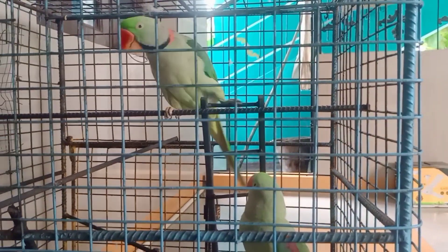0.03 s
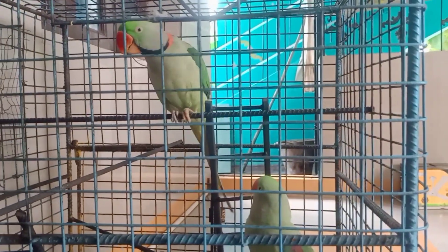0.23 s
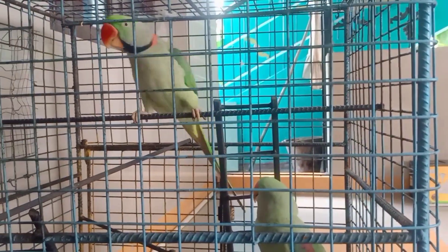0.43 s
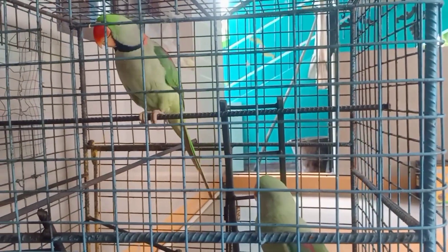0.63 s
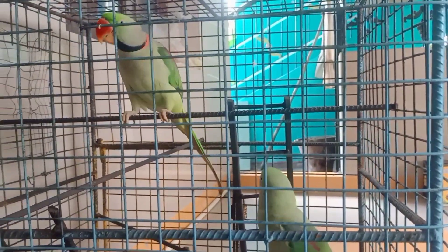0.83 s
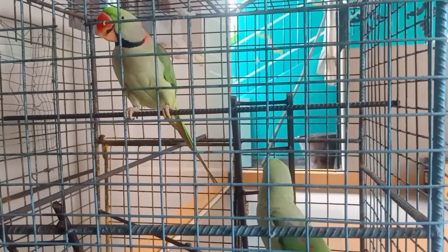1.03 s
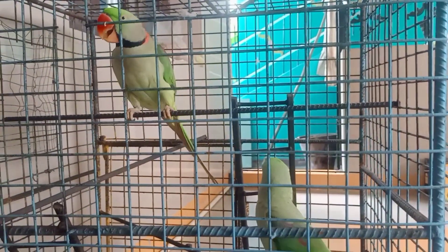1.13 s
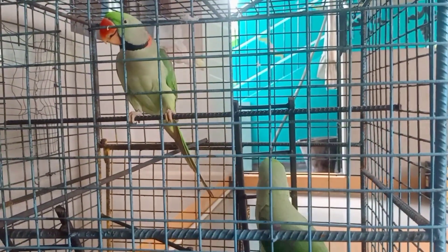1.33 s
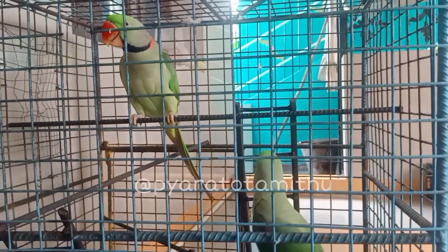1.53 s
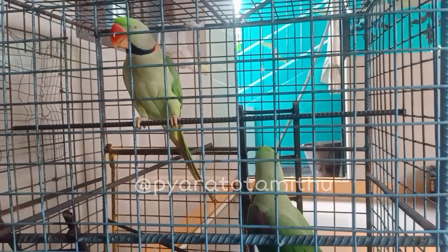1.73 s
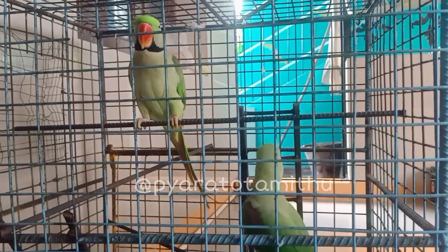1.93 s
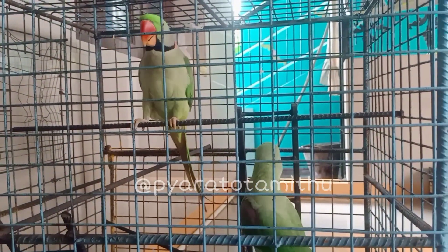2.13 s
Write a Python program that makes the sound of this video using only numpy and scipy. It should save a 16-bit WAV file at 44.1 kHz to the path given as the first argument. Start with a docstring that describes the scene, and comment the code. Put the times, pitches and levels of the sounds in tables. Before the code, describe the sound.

One shrill parakeet squawk cuts through a steady indoor hiss, stepping down in pitch and briefly overloading the microphone. The room echoes for a moment, and the hiss carries on more quietly afterwards.

```python
"""A parakeet calls in a hard-walled room

A caged parakeet gives one loud call: a rasp that sweeps up through its throat resonance, a high
sagging whistle that briefly overloads the left microphone, then a sudden break down to a lower note.
The room rings on behind it, over a hiss of shaped noise, a few dull bumps and two faint tinks.
The recorder's gain control turns down for the call and stays partly down afterwards."""
import sys
import numpy as np
from scipy import signal
from scipy.fft import rfft, irfft, next_fast_len
from scipy.io import wavfile
from scipy.ndimage import uniform_filter1d, minimum_filter1d, map_coordinates

SR = 44100
rng = np.random.default_rng(int(sys.argv[2]) if len(sys.argv) > 2 else 0)


def transcribe(u):
    """Save the signal u as a 16-bit wav file named by the first command-line argument.

    u: samples, shape (n,) or (channels, n), limited to [-1, 1]; the rate is SR.
    q: integer samples, one column per channel.
    """
    v = np.clip(np.atleast_2d(u).T, -1, 1)
    q = np.round(v * 32767).astype(np.int16)
    wavfile.write(sys.argv[1], SR, q)


N = 96887

# The tone of the hiss. Each row: frequency in Hz, relative level in dB.
HISS_TONE = [(15, -50), (25, -38), (59, -13.5), (125, -10), (196, -18.5), (250, -9.5), (450, -3),
             (543, 1.5), (749, -6), (1030, -3.5), (1540, -7.5), (2370, -9), (3930, -20), (4500, -25),
             (6900, -35.5), (9520, -64), (15000, -92)]
# How alike the hiss is on both sides. Each row: frequency in Hz, likeness (1 is identical).
HISS_LIKENESS = [(60, 0.96), (290, 1), (640, 0.067), (1410, 0.27), (3100, 0.14), (6800, 0.082)]
# Which way the hiss leans. Each row: frequency in Hz, left minus right in dB.
HISS_LEAN = [(100, 0), (400, -1.5), (1300, -5), (2400, -0.5), (4400, 2.5), (8000, 14)]
# Swells in the hollow low middle of the hiss. Each row: time in seconds, boost in dB.
BODY_SWELLS = [(0, -7), (.1, -4), (.3, 1.5), (.39, -4.5), (.54, -1.5), (.72, -4), (.78, 0), (.98, -2.5),
               (1.08, 0), (1.22, 0.5), (1.4, -4), (1.85, -9), (2.1, -13.5)]
# Swells in the treble of the hiss. Each row: time in seconds, boost in dB.
TREBLE_SWELLS = [(0, -1), (.26, 0.5), (.38, -2), (.48, -5.5), (.66, -6.5), (.78, -2), (1.2, 0), (2.1, -2)]
# Dull bumps. Each row: middle in seconds, half length in seconds, level in dB, pitch in Hz.
LOW_BUMPS = [(0.197, 0.037, -50, 130), (.63, 0.048, -47, 114), (1.048, 0.12, -60, 66),
             (1.146, 0.0056, -41, 126), (1.398, 0.017, -19.5, 90)]
# How long the room rings. Each row: frequency in Hz, seconds to fade by 60 dB.
ROOM_RING = [(500, 0.15), (2300, 0.48), (2900, 0.48), (4500, 0.45), (8000, 0.41), (14000, 0.33)]
# Faint tinks. Each row: start in seconds, level in dB.
WIRE_TINKS = [(.345, -50), (.364, -51)]
# How the bird's throat shapes sound. Each row: frequency in Hz, relative level in dB.
THROAT_TONE = [(300, -68.5), (450, -26.5), (680, -10), (1000, -10.5), (1700, -19), (2400, 3.5),
               (3150, -5.5), (3720, -4.5), (5100, -16.5), (7000, -24), (9800, -53.5), (15000, -46)]
# The opening rasp. Each row: time in seconds, pitch in Hz, level in dB.
RASP_SWEEP = [(1.275, 590, -13), (1.281, 700, -4), (1.286, 930, 0), (1.289, 1300, 4.5), (1.292, 1620, 6.5),
              (1.296, 2050, 7), (1.300, 2180, -2), (1.305, 2420, -3)]
# The high whistle; standing waves in the room boost or weaken it at each microphone.
# Each row: time in seconds, pitch in Hz, level in dB, left boost in dB, right boost in dB.
HIGH_NOTE = [(1.305, 3097, 0, -3, 10.5), (1.312, 3082, 6, 2.5, 6.5), (1.325, 3017, 4.5, 9, 2.5),
             (1.341, 3022, 5.5, -12.5, 1.5), (1.353, 3017, 5.5, 1.5, -12.5), (1.375, 2961, 3.5, 4, 4.5),
             (1.381, 2877, 8, 7, 9.5), (1.400, 2824, 8.5, 3, 14.5), (1.411, 2742, 5.5, -2, -23)]
# The lower note after the break, with the same columns.
LOW_NOTE = [(1.409, 2346, 10, -11, -9), (1.417, 2209, 8.5, -1, 2.5), (1.443, 2191, 4, -10, 15.5),
            (1.466, 2196, 5.5, -26, 10), (1.481, 2233, 8, -6.5, 4.5), (1.491, 2273, 3, -4.5, -9)]
# Each note's harmonics. Each entry: starting level in dB at 1, 2, 3.. times the pitch.
HIGH_HARMONICS = [1, -16.5, -37, -47, -44]
LOW_HARMONICS = [-3, -11, -22, -39.5, -51]
# Distortion from the overloaded left microphone. Each row: multiple of the pitch, level in dB.
OVERLOAD_TONES = [(3, -4.5), (4, -31.5), (5, -12.5)]
# The fizz of microphone overload. Each row: frequency in Hz, relative level in dB.
FIZZ_TONE = [(5000, -33.5), (8500, 2.5), (10000, -12), (11300, 0.5), (12500, -12), (14000, -4.5),
             (15500, -14)]
# The right microphone hears the bird duller. Each row: frequency in Hz, gain in dB.
RIGHT_MIC_TONE = [(3000, -0.5), (6500, -7.5), (8500, -23.5), (15000, -21)]

TIME = np.arange(N) / SR  # seconds
JITTER_HZ = 900  # how fast the voice trembles


def amp(db):
    """Turn decibels into a gain."""
    return 10 ** (np.asarray(db) / 20)


def unit(x):
    """Scale a sound to an average (rms) level of 1."""
    return x / np.sqrt(np.mean(x ** 2) + 1e-20)


def along(table, hz):
    """Read between the rows of a frequency table, on a log scale."""
    freqs, values = np.transpose(table)
    return np.interp(np.log(hz + 1), np.log(freqs + 1), values)


def curves(rows):
    """Join the rows of a time table into one curve for each column after the time."""
    times, *columns = np.transpose(rows)
    return [np.interp(TIME, times, column) for column in columns]


def wobble(rate_hz):
    """A smooth curve through rate_hz random values a second."""
    return map_coordinates(rng.standard_normal(N), [TIME * rate_hz])


def filtered(x, response):
    """Scale each frequency of x by response(hz)."""
    size = next_fast_len(N + SR // 2)
    return irfft(rfft(x, size) * response(np.fft.rfftfreq(size, 1 / SR)), size)[..., :N]


def band(centre_hz, octaves):
    """A bell-shaped filter response around one pitch."""
    return lambda hz: np.exp(-.5 * (np.log2((hz + 1) / centre_hz) / octaves) ** 2)


def shaped_noise(tone):
    """Noise with the tone that a table gives."""
    return unit(filtered(rng.standard_normal(N), lambda hz: amp(along(tone, hz))))


def panned(pan_db):
    """Left and right gains of constant total power; positive leans left."""
    gains = amp(np.array([pan_db, -pan_db]) / 2)
    return gains / np.sqrt(np.mean(gains ** 2, axis=0))


def hump(middle_s, half_length_s):
    """A smooth rise and fall around one moment."""
    return np.exp(-((TIME - middle_s) / half_length_s) ** 2)


def gate(rows, edge_s=0.0027):
    """Fade in quickly at the first row's time and out at the last."""
    inside_s = np.minimum(TIME - rows[0][0], rows[-1][0] - TIME)
    return np.sin(np.pi / 2 * np.clip(inside_s / edge_s + .5, 0, 1)) ** 2


def hiss(ring_hz=540.5, ring_width_hz=21, level_db=-33, rise_db_per_s=0.25):
    """A background rush with a hollow resonance, alike on both sides only in the bass."""
    def colour(hz):
        split = np.arccos(np.clip(along(HISS_LIKENESS, hz), -1, 1)) / 2
        ring_db = 5 / (1 + ((hz - ring_hz) / ring_width_hz) ** 2)
        return amp(along(HISS_TONE, hz) + ring_db) * [np.cos(split), np.sin(split)]
    mid, side = filtered(rng.standard_normal((2, N)), colour)  # the shared and the opposite part
    pair = np.array([mid + side, mid - side])
    pair = unit(filtered(pair, lambda hz: panned(along(HISS_LEAN, hz))))
    waver_db = .35 * wobble(rate_hz=6.53)
    return pair * amp(level_db + rise_db_per_s * TIME + waver_db)


def swelling(x, treble_hz=4000):
    """The low middle and the treble of the hiss swell and sink separately."""
    body = filtered(x, band(centre_hz=495, octaves=0.67))
    treble = filtered(x, lambda hz: hz ** 2 / (hz ** 2 + treble_hz ** 2))
    body_gain = amp(curves(BODY_SWELLS)[0])
    treble_gain = amp(curves(TREBLE_SWELLS)[0])
    return x + body * (body_gain - 1) + treble * (treble_gain - 1)


def bumps(width_db=-3):
    """Dull bumps of low noise, the loudest under the peak of the whistle."""
    out = np.zeros((2, N))
    for middle_s, half_length_s, db, pitch_hz in LOW_BUMPS:
        mid, side = unit(filtered(rng.standard_normal((2, N)), band(pitch_hz, octaves=1)))
        side = side * amp(width_db)
        out += np.array([mid + side, mid - side]) * amp(db) * hump(middle_s, half_length_s)
    return out


def room(x, early_s=0.012, early_db=-11, tail_db=-3.5):
    """The echoes of x: near walls answer at once, then a tail rings, longest around the bird's pitch."""
    hz, times, spectrum = signal.stft(rng.standard_normal((2, SR)), SR, nperseg=256)
    fade = amp(-60 * times / along(ROOM_RING, hz)[:, None])
    tail = signal.istft(spectrum * fade, SR, nperseg=256)[1]
    age = np.arange(tail.shape[1]) / SR
    early = rng.standard_normal(tail.shape) * np.exp(-age / early_s)
    echoes = amp(tail_db) * tail / np.linalg.norm(tail[0])
    echoes += amp(early_db) * early / np.linalg.norm(early[0])
    return signal.fftconvolve(x[None], echoes, axes=1)[:, :N]


def tinks(pitch_hz=5000, ring_s=0.063, attack_s=0.0028):
    """Faint high tinks, probably a cage wire touched by a claw."""
    out = np.zeros(N)
    for start_s, db in WIRE_TINKS:
        age = np.maximum(TIME - start_s, 0)
        loudness = amp(db - 60 * age / ring_s) * (1 - np.exp(-age / attack_s))
        out += loudness * np.sin(2 * np.pi * pitch_hz * age)
    return out + room(out)


def overload_fizz(level_db=-34):
    """Thin treble fizz of distortion at the call's loudest moment."""
    return shaped_noise(FIZZ_TONE) * amp(level_db) * hump(middle_s=1.398, half_length_s=0.041)


def mic_overload(phase, roughness=.09):
    """Brief harsh distortion as the whistle's peak overloads the left microphone."""
    rough_phase = phase + roughness * wobble(JITTER_HZ)
    distortion = sum(amp(db) * np.sin(round(k) * rough_phase) for k, db in OVERLOAD_TONES)
    return distortion * hump(middle_s=1.393, half_length_s=0.011)


def voice_phase(pitch_hz, jitter):
    """The running angle of a vibration whose pitch trembles by the fraction jitter."""
    return 2 * np.pi * np.cumsum(pitch_hz * (1 + jitter * wobble(JITTER_HZ))) / SR


def rasp(base_tone_db=-15, air_db=-8):
    """An unsteady buzz sweeps up through the throat resonance, with a puff of air in each cycle."""
    pitch_hz, level_db = curves(RASP_SWEEP)
    phase = voice_phase(pitch_hz, jitter=.008)
    multiples = np.arange(1, 9)[:, None]
    weights = amp(along(THROAT_TONE, multiples * pitch_hz))
    buzz = (weights * np.sin(multiples * phase)).sum(0) / np.sqrt((weights ** 2).sum(0) / 2)
    buzz += amp(base_tone_db) * np.sqrt(2) * np.sin(phase)
    puffs = amp(air_db) * shaped_noise(THROAT_TONE) * (1 + .5 * np.cos(phase))
    return gate(RASP_SWEEP) * amp(level_db) * (buzz + puffs)


def whistle(rows, harmonics_db, mellow_db_per_s, jitter, air_db, air_fade_db_per_s=183.5):
    """A note grows purer as overtones and rushing air fade; gives sound, microphone gains and phase."""
    pitch_hz, level_db, left_db, right_db = curves(rows)
    age = np.clip(TIME - rows[0][0], 0, rows[-1][0] - rows[0][0])
    phase = voice_phase(pitch_hz, jitter)
    base, *overtones = [np.sqrt(2) * amp(db) * np.sin(k * phase) for k, db in enumerate(harmonics_db, 1)]
    tone = base + amp(-mellow_db_per_s * age) * sum(overtones)
    air = amp(air_db - air_fade_db_per_s * age) * shaped_noise(THROAT_TONE)
    return gate(rows) * amp(level_db) * (tone + air), amp([left_db, right_db]), phase


def parakeet(low_cut_hz=530):
    """Rasp, high whistle and low note, with room echoes and microphone overload at the peak."""
    opening, fizz = rasp(), overload_fizz()
    high, high_gains, high_phase = whistle(
        HIGH_NOTE, HIGH_HARMONICS, mellow_db_per_s=65, jitter=.0025, air_db=-14)
    low, low_gains, _ = whistle(LOW_NOTE, LOW_HARMONICS, mellow_db_per_s=26.5, jitter=.0018, air_db=-35)
    direct = opening * panned(pan_db=-4)[:, None] + high * high_gains + fizz + low * low_gains
    echoes = room(opening + high + fizz + low)
    left, right = filtered(direct + echoes, lambda hz: 1 - 1 / (1 + (hz / low_cut_hz) ** 10))
    right = filtered(right, lambda hz: amp(along(RIGHT_MIC_TONE, hz)))
    return np.array([left + mic_overload(high_phase), right])


def scene(left_lead_s=0.0004128):
    """The bird over the background, all arriving a little earlier on the left."""
    mix = parakeet() + swelling(hiss()) + bumps() + tinks()
    lead_s = np.array([[.5], [-.5]]) * left_lead_s
    return filtered(mix, lambda hz: np.exp(2j * np.pi * hz * lead_s))


def gain_control(x, threshold_db=-16, squeeze=0.65, ahead_s=0.025, hold_s=0.045, held_cut_db=8):
    """The recorder turns down just ahead of loud sound; up to held_cut_db of the cut stays."""
    width = int(0.018 * SR)  # smooth over 18 ms
    power = uniform_filter1d(np.mean(x, axis=0) ** 2, width)
    level_db = 10 * np.log10(np.abs(power) + 1e-12)
    needed_db = -squeeze * np.maximum(level_db - threshold_db, 0)
    fast_db = minimum_filter1d(needed_db, int((ahead_s + hold_s) * SR))
    fast_db = np.interp(TIME - (hold_s - ahead_s) / 2, TIME, fast_db)
    held_db = np.maximum(np.minimum.accumulate(fast_db), -held_cut_db)
    return x * amp(uniform_filter1d(np.minimum(fast_db, held_db), width))


def limiter(x, ceiling=0.79, smooth_s=0.0095):
    """Smoothly hold each channel's peaks under the ceiling."""
    width = int(smooth_s * SR)
    needed_gain = np.minimum(1, ceiling / (np.abs(x) + 1e-9))
    return x * uniform_filter1d(minimum_filter1d(needed_gain, width), width)


def record(dry):
    """The recorder controls the gain, limits the peaks and drops the highest treble."""
    return filtered(limiter(gain_control(dry)), lambda hz: hz < 15600)


dry = scene()
out = record(dry)
transcribe(out)
```